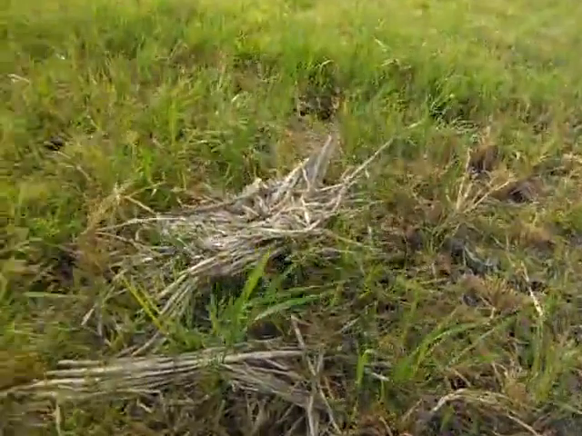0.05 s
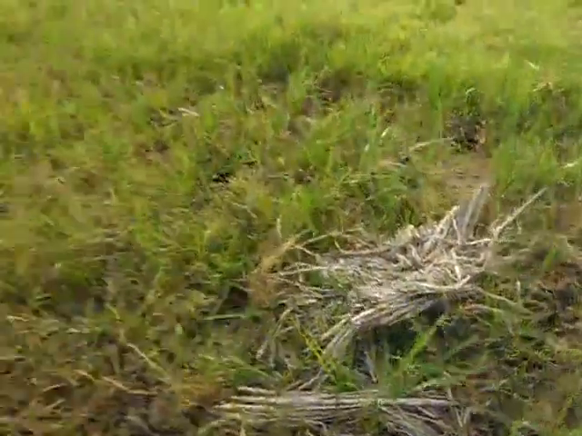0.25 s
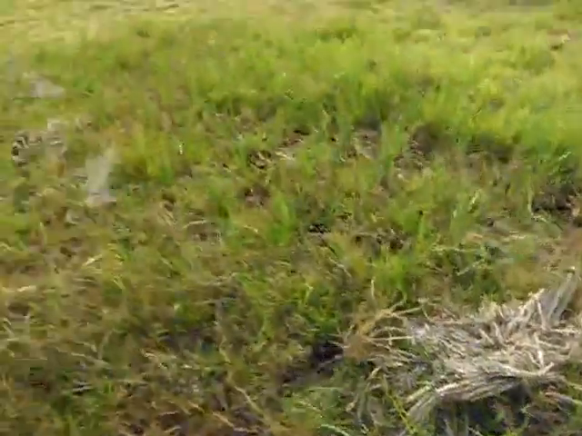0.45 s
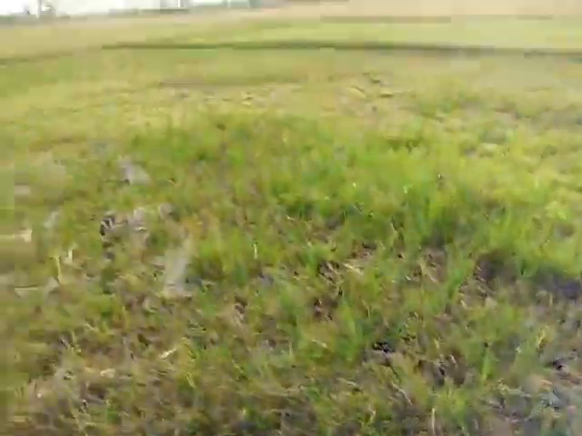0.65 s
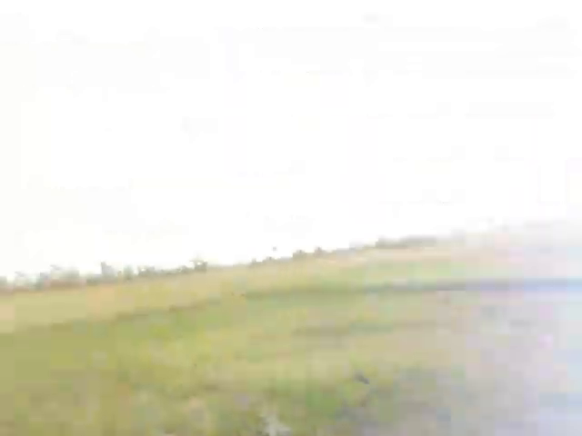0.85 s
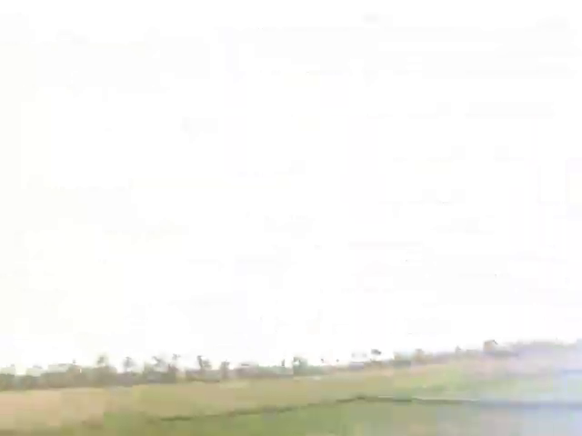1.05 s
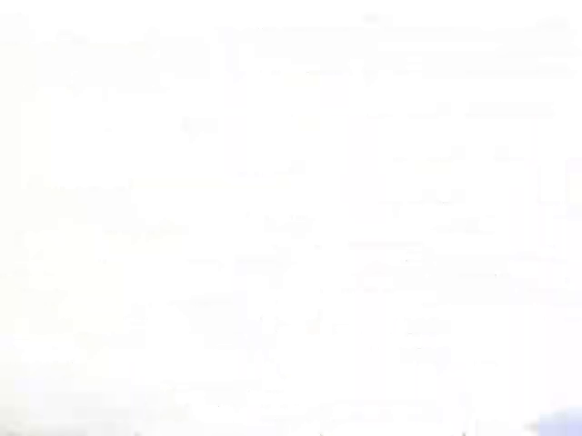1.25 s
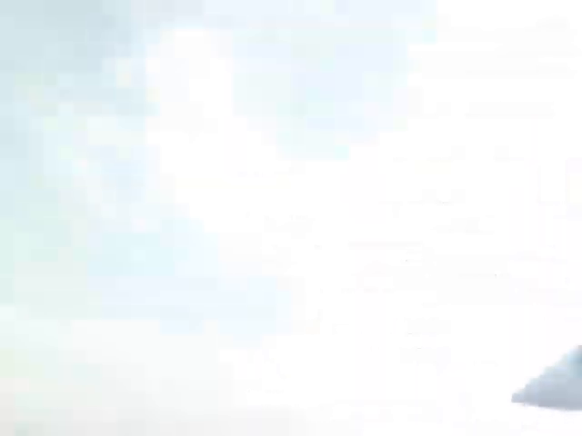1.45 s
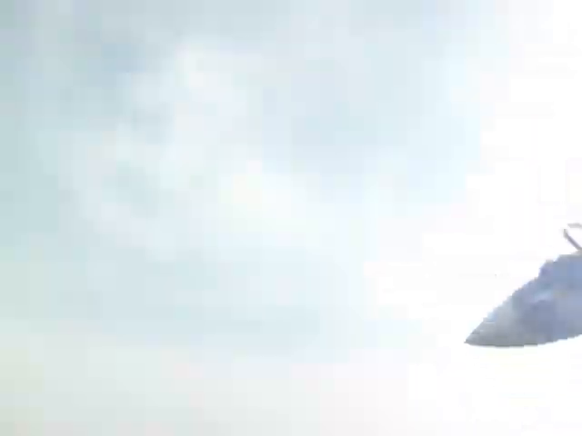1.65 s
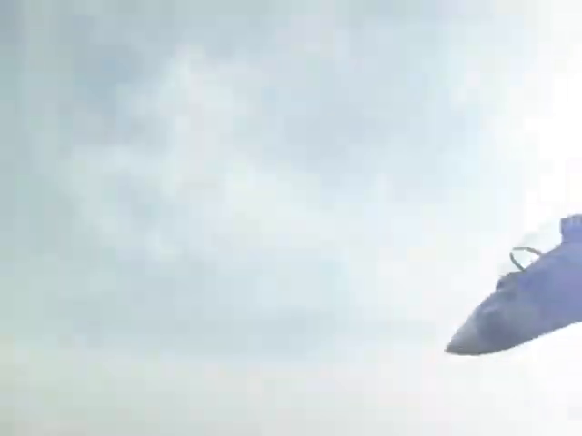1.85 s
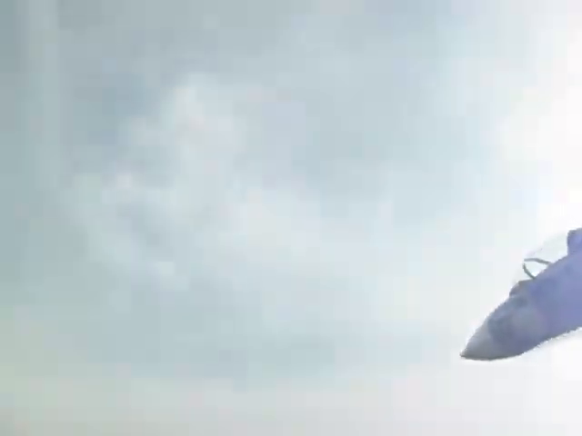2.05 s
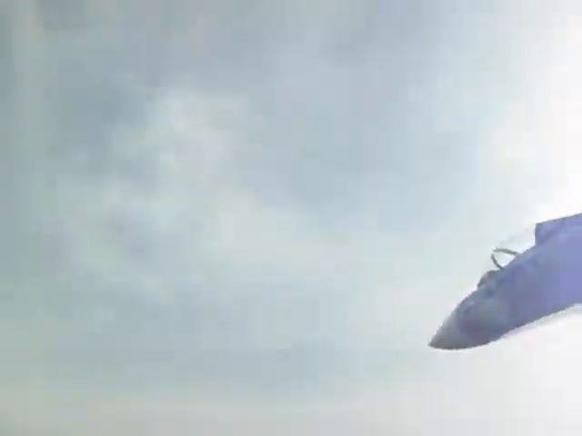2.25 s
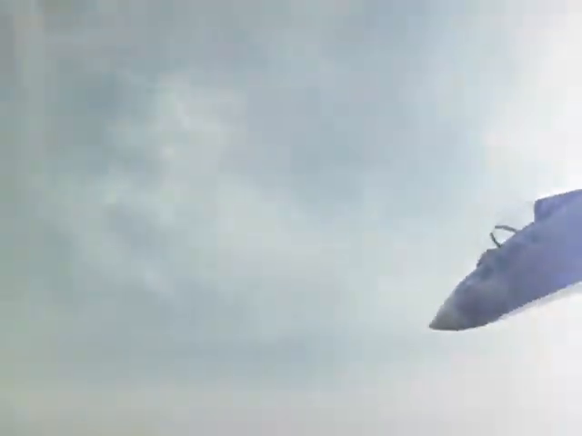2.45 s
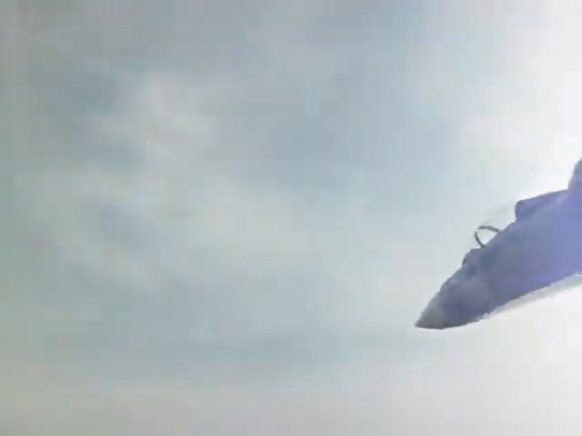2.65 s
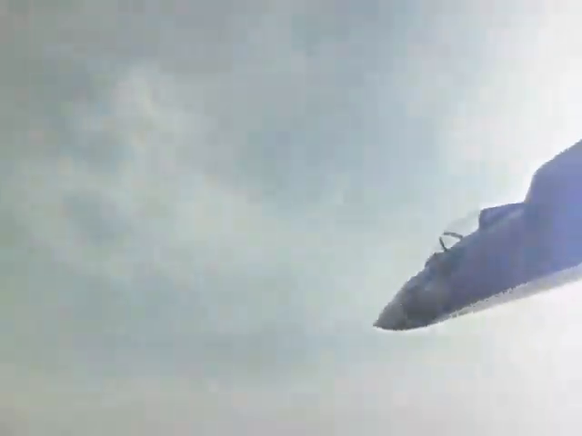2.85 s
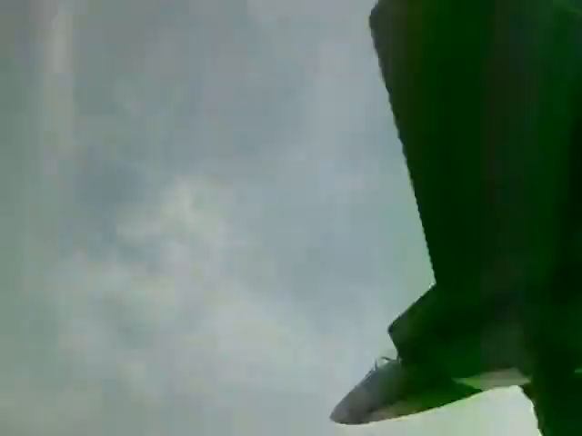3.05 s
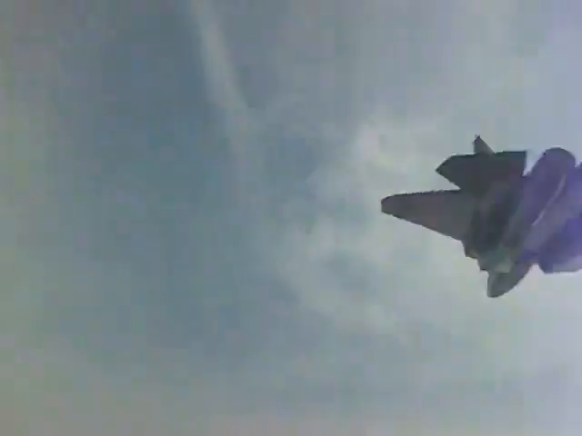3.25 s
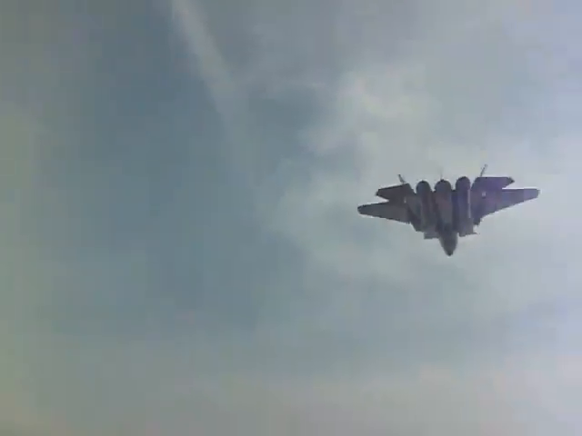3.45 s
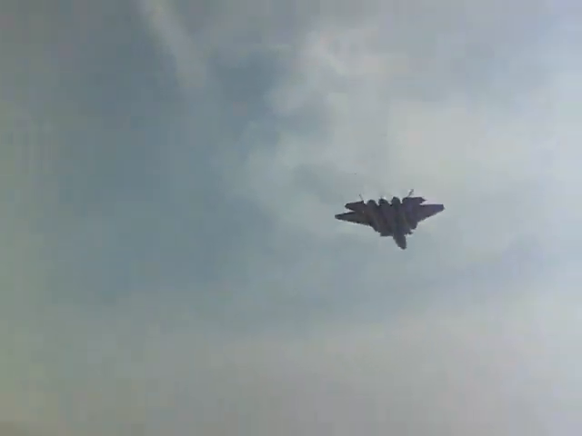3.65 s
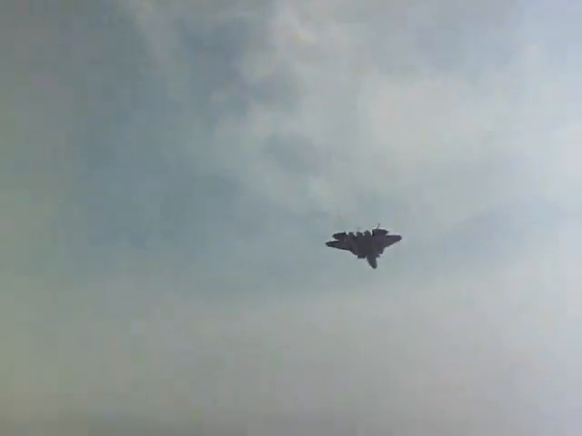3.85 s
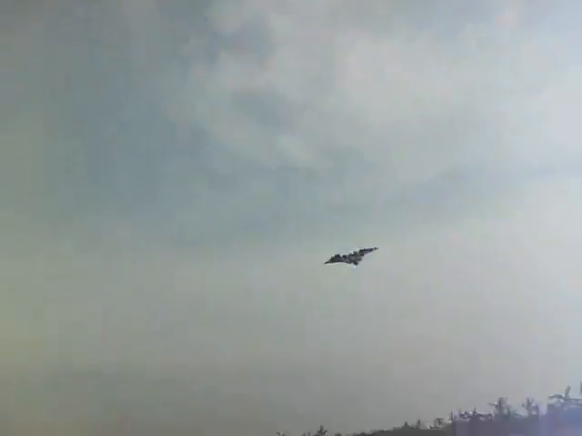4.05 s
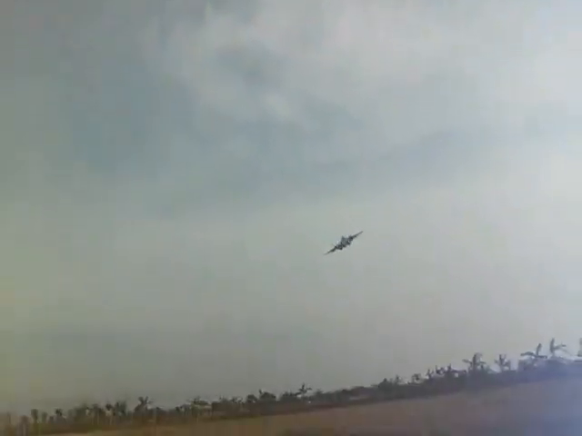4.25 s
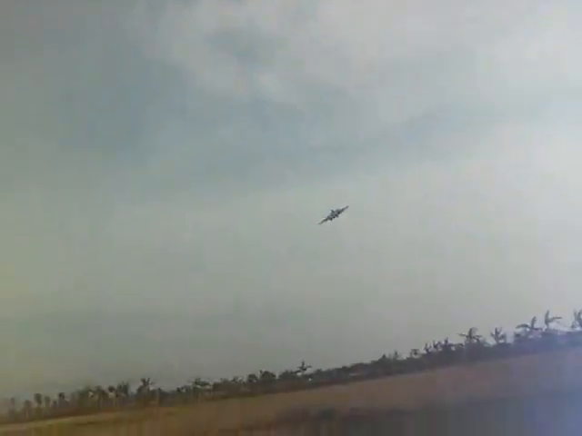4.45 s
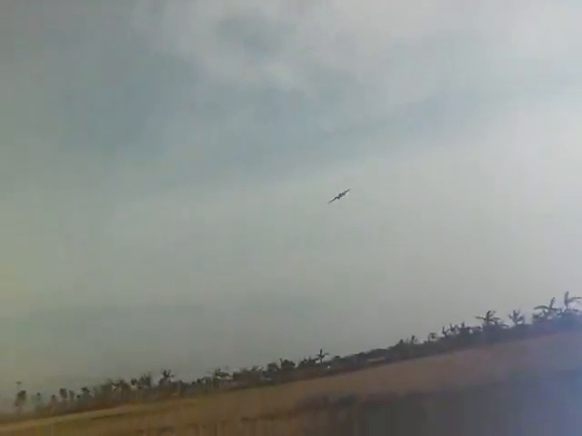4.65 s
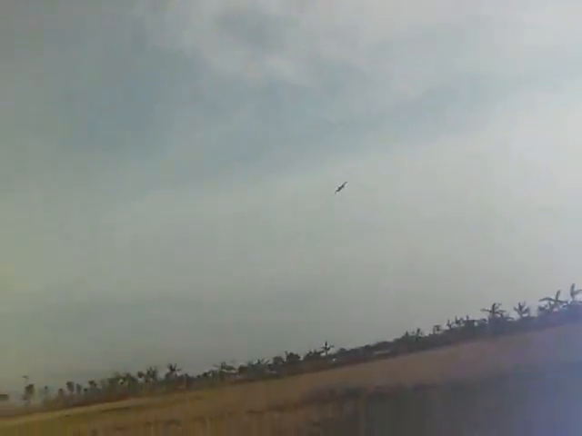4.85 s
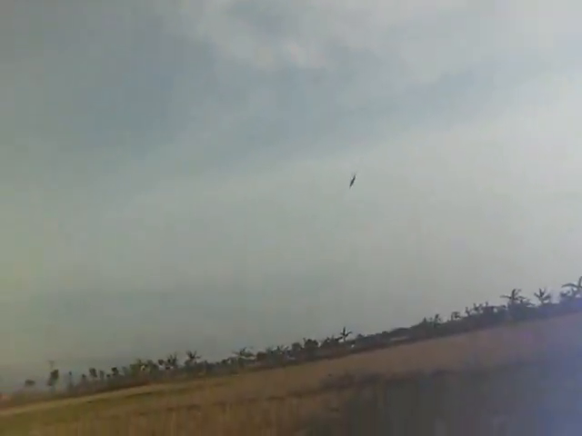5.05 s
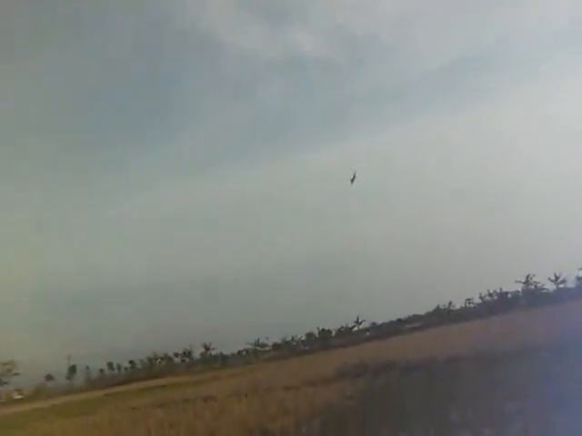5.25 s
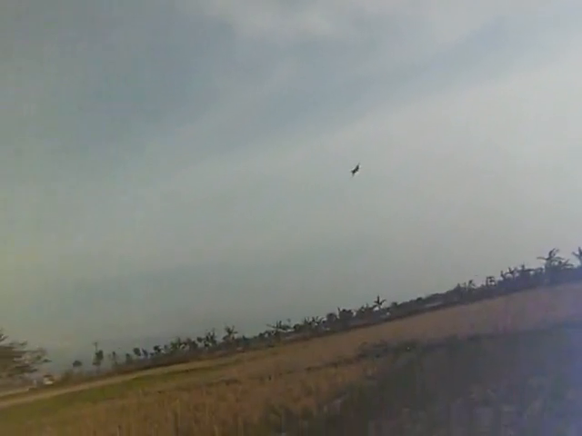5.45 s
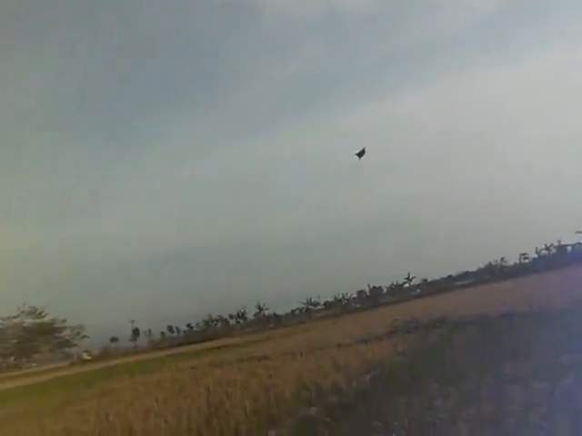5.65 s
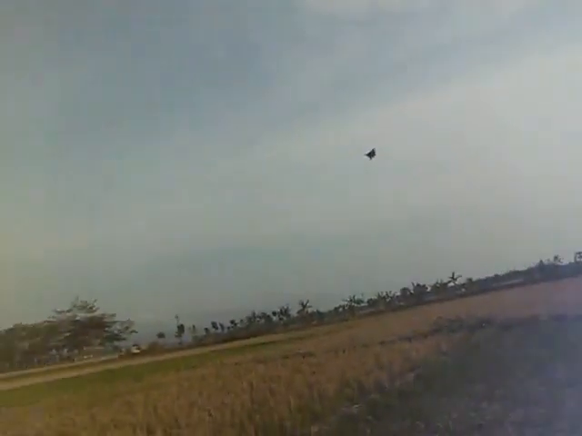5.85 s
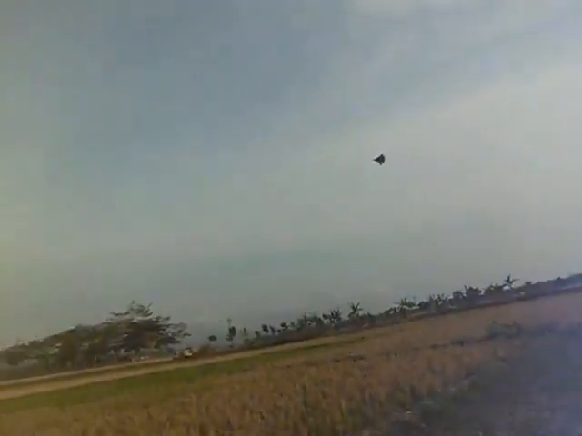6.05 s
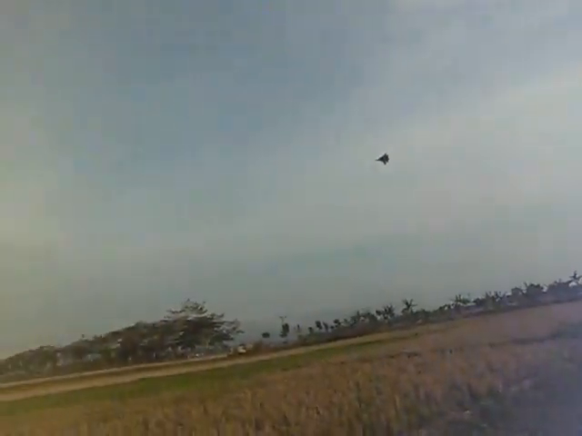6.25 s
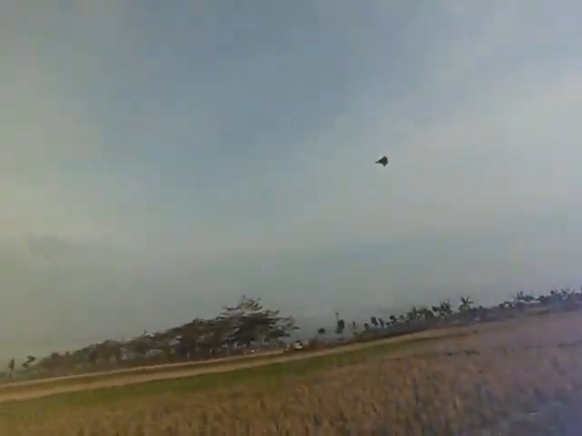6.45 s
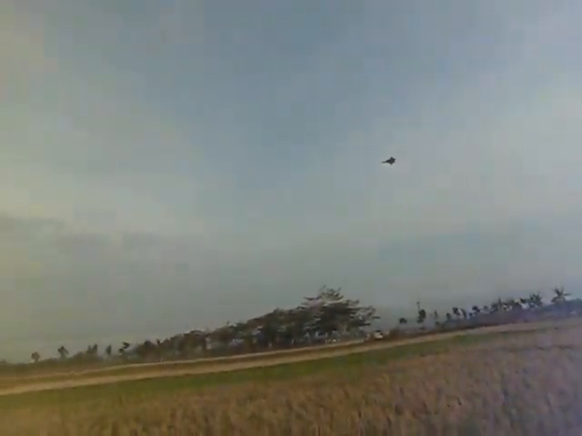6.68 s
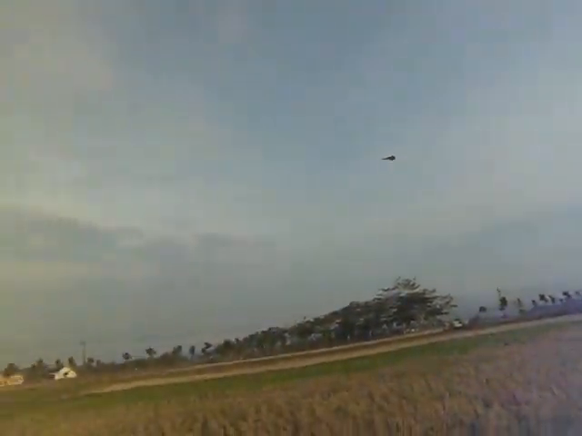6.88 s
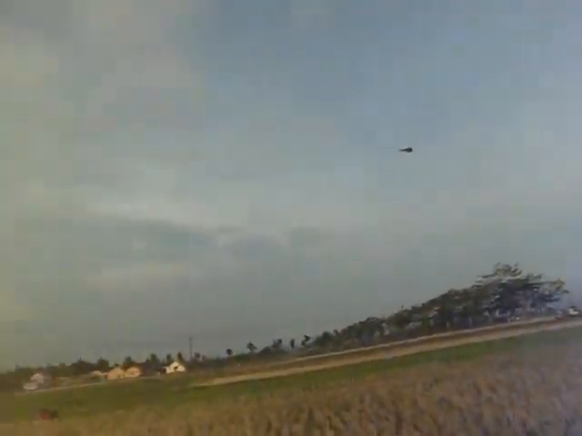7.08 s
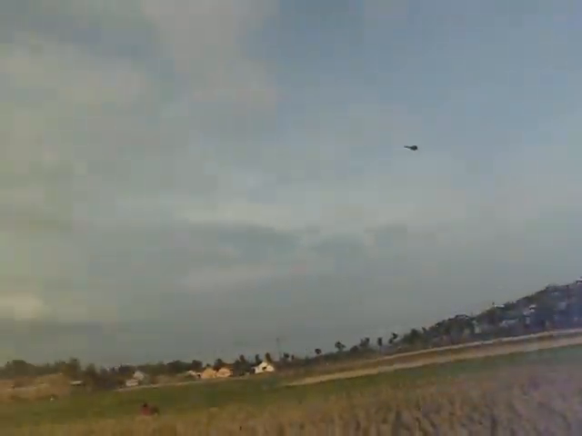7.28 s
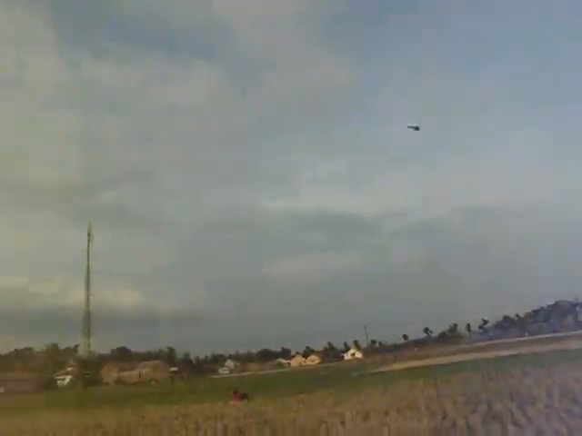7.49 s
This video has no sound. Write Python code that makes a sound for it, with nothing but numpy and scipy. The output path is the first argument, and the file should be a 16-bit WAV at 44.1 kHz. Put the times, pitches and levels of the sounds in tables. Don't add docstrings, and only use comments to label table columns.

```python
import sys
import numpy as np
from scipy import signal
from scipy.fft import rfft, irfft, next_fast_len
from scipy.io import wavfile
from scipy.ndimage import uniform_filter1d, map_coordinates

SR = 44100
rng = np.random.default_rng(int(sys.argv[2]) if len(sys.argv) > 2 else 0)


def amplitude_ratio(level_db):
    exponent = np.asarray(level_db, float) / 20
    return 10 ** exponent


def put_to_file(sound):
    columns = np.atleast_2d(sound).T
    safe = np.clip(columns, -1, 1)
    whole_steps = np.round(safe * 32767)
    wavfile.write(sys.argv[1], SR, whole_steps.astype(np.int16))


N = 331670
SECONDS = np.arange(N) / SR


def unit(x):
    return x / np.sqrt(np.mean(x ** 2) + 1e-20)


def curves(rows, silent=None):
    s, *columns = np.transpose(rows)
    return [np.interp(SECONDS, s, column, silent, silent) for column in columns]


def wobble(rate):
    coarse = np.arange(0, N + 32, 32)
    knots = rng.standard_normal(int(N * rate / SR) + 6)
    return np.interp(np.arange(N), coarse, map_coordinates(knots, [coarse * rate / SR]))


def coloured(x, spectrum):
    size = next_fast_len(N + 8192)
    hz, db = np.transpose(spectrum)
    log_hz = np.log(np.fft.rfftfreq(size, 1 / SR) + 1)
    gain = amplitude_ratio(np.interp(log_hz, np.log(hz), db, -120, -120))
    return unit(irfft(rfft(x, size) * gain, size)[:N])


def patchy(depth_db):
    z = signal.stft(rng.standard_normal(N), nperseg=512)[2]
    field = uniform_filter1d(rng.standard_normal(z.shape), size=6, axis=0)
    field = uniform_filter1d(field, size=14, axis=1)
    return signal.istft(z * amplitude_ratio(depth_db * unit(field)), nperseg=512)[1][:N]


def tones(angles, dbs, drift_db, scatter):
    shares = scatter if isinstance(scatter, list) else [scatter] * len(angles)
    out = np.zeros(N)
    for i, (angle, db, share) in enumerate(zip(angles, dbs, shares)):
        level = np.sqrt(2) * amplitude_ratio(db + drift_db * wobble(5))
        phase = angle + i * i
        direct = (1 + share * wobble(42)) * np.sin(phase)
        out += level * (direct + share * wobble(42) * np.cos(phase))
    return out


# time in seconds, wind pressure in dB, sharpness in dB.
WIND = [(0, -30.5, -9.5), (.125, -20, 1.6), (.24, -30, 1), (.37, -22, 1), (.5, -27.5, 1), (.67, -34.5, 0),
        (.8, -31, 1), (1.0, -34.5, -0.5), (1.09, -45.5, 6.5), (3.3, -42, -16), (4.1, -52, 11),
        (6.0, -39, -18), (6.8, -41, -8), (7.03, -28.5, 11.5), (7.11, -16, -1.5), (7.29, -27.5, 5),
        (7.4, -24, 13), (7.5, -17.5, 3)]
# middle in seconds, pressure in dB, sharpness in dB, half length in seconds.
GUSTS = [(0.052, -36, 14, .012), (0.09, -36, 10, .012), (0.206, -30, 13.5, 0.013), (0.275, -30.5, 13, .012),
         (.317, -30, 15, .01), (0.346, -27, 13.5, .012), (.443, -32.5, 14, .012), (.476, -37, 10, .01),
         (0.797, -29.5, 12, .01), (7.243, -27, 11, 0.0095), (7.276, -28, 18.5, .01),
         (6.948, -33, 14, 0.013), (1.328, -41, 19, 0.038), (1.614, -40, 15, 0.19), (1.94, -31.5, -23, 0.15),
         (2.164, -37.5, 22.5, 0.082), (2.378, -44, -9.5, 0.053), (2.647, -37, -26, 0.084),
         (2.807, -35, 16, 0.1), (2.958, -34.5, 25, 0.13), (3.116, -31.5, 16.5, 0.062),
         (3.271, -35, 0.5, 0.095), (3.457, -29, 5, 0.036), (3.526, -28, 15.5, 0.016),
         (3.582, -27.5, -23, 0.059), (3.678, -30, -8.5, 0.095), (3.791, -26, -20, 0.051),
         (3.917, -34, -30, 0.11), (4.103, -44, -6, 0.069), (4.497, -34, -11, 0.094), (4.69, -31, -33, 0.1),
         (4.895, -36, -25, 0.065), (5.278, -41, -18, 0.094), (5.403, -30, -27, .03),
         (5.64, -32.5, -24, 0.07), (5.809, -38.5, -3, 0.048), (6.281, -29, -14.5, 0.16),
         (6.568, -26, 9.5, 0.035), (6.61, -33.5, 22.5, 0.029), (7.044, -22, 19, 0.0085),
         (7.451, -23, 15, 0.061)]


def wind_levels():
    t = np.arange(0, N + 64, 64) / SR
    s, db, sharp_db, half_s = np.transpose(GUSTS)[..., None]
    wind_s, *columns = np.transpose(WIND)
    steady_db, steady_sharp_db = [np.interp(t, wind_s, column) for column in columns]
    push = np.vstack([steady_db, db - 12 * np.abs(t - s) / half_s])
    sharp = np.vstack([steady_sharp_db, sharp_db + 0 * t])
    over_db = push + 20
    eddy = -20 + 1.456 * over_db + 0.34 * sharp
    tear = -26.5 + 1.673 * over_db + sharp
    return [np.interp(SECONDS, t, 10 * np.log10(amplitude_ratio(2 * v).sum(axis=0))) for v in (push, eddy, tear)]


# frequency in Hz, level in dB per Hz.
SWELL = [(5, -6.5), (36, 4.5), (60, -3), (110, -19), (200, -67.5)]
EDDY = [(40, -17), (85, 2), (140, -1), (220, -16), (450, -36.5)]
TEAR = [(110, -37), (200, -1), (330, -3), (500, -8), (800, -20.5), (1500, -48)]
LASH = [(250, -41), (500, -4.5), (750, 3.5), (1500, -8.5), (2700, -30.5), (4500, -59), (7000, -57)]
# time in seconds, drop in dB, fall time in milliseconds.
RIPS = [(0.1175, -13, 0.7), (0.124, -7.5, 0.56), (0.1305, -15, 0.3), (0.316, -12.5, 0.83),
        (0.3515, -11.5, 0.75), (0.3582, -14.5, 0.54), (0.3671, -8, 0.81), (0.3967, -14, 0.87),
        (0.406, -13, 0.63), (6.542, -19, 0.95), (6.5486, -15.5, 1), (6.556, -22, 0.66), (6.5624, -20, 0.65),
        (6.5684, -26, 0.38), (6.575, -21, 0.54), (6.602, -20.5, 0.5), (6.6135, -18, 0.69),
        (6.6175, -16.5, 0.56), (6.97, -14, 0.5), (6.991, -15, 0.65), (7.0402, -15.5, 0.26),
        (7.0451, -14.5, 0.39), (7.053, -16.5, 0.86), (7.0794, -7.5, 0.41), (7.094, -11, 0.8),
        (7.1074, -5.5, 0.59), (7.1229, -10, 0.35), (7.132, -10, 0.66), (7.1385, -10, 0.4),
        (7.1422, -14, 0.4), (7.1492, -3.5, 0.42), (7.1739, -7, 0.59), (7.1894, -5, 0.47),
        (7.2087, -5, 0.77), (7.2624, -9, 0.79), (7.2827, -10, 0.43), (7.3482, -21.5, 0.6),
        (7.3765, -7, 0.59), (7.3927, -6.5, 0.46), (7.4023, -4, 0.35), (7.4104, -6, 0.33),
        (7.4156, -8, 0.44), (7.4203, -11, 0.47), (7.4243, -8, 0.2), (7.4275, -11, 0.54),
        (7.4365, -11, 0.37), (7.4397, -3.5, 0.21), (7.4437, -17, 0.16), (7.4461, -2, 0.25),
        (7.4495, -16, 0.46), (7.4553, -4, 0.22), (7.4602, -4, 0.57), (7.467, -3, 0.17),
        (7.4723, -5.5, 0.18), (7.48, -6, 0.57), (7.486, -7, 0.39), (7.4988, -8.5, 0.44),
        (7.5088, -17, 0.45), (7.5121, -11, 0.26)]


def wind():
    swell_db, eddy_db, tear_db = wind_levels()
    bursts = rng.standard_normal(N) * amplitude_ratio(4.5 * wobble(220) + 1.5 * wobble(45))
    bursts /= np.sqrt(np.abs(uniform_filter1d(bursts ** 2, size=3500)))
    drops, hush = np.zeros(N + SR), np.zeros(N + SR)
    t = np.arange(-600, 600) / SR
    build_s, refill_s = 0.0024, 0.0026
    for s, db, fall_ms in RIPS:
        start = round(s * SR) - 600
        shape = np.exp(-np.abs(t) / np.where(t < 0, build_s, refill_s))
        drops[start:][:len(t)] -= amplitude_ratio(db - 4) * np.tanh(2000 * t / fall_ms) * shape
        hush[start:][:len(t)] += np.hanning(len(t))
    bursts *= amplitude_ratio(-6 * np.minimum(hush[:N], 1))
    lash_db = tear_db - 0.5 + 2.1 * np.minimum(tear_db + 20, 0)
    out = amplitude_ratio(swell_db) * coloured(rng.standard_normal(N), SWELL)
    out += amplitude_ratio(eddy_db + 0.2) * coloured(bursts, EDDY)
    out += amplitude_ratio(tear_db - 1.55) * coloured(bursts, TEAR)
    out += amplitude_ratio(lash_db) * coloured(bursts, LASH)
    return out + drops[:N]


# time in seconds, level in
# dB, pitch in Hz.
TICKS = [(0.276, -48, 2100), (0.2753, -50, 6000), (0.4214, -46.5, 3300), (0.441, -47, 3370),
         (0.441, -44.5, 5340), (.006, -49, 4400), (.441, -51, 2490), (0.5067, -46, 2340),
         (0.5067, -46, 5850), (.622, -56, 5400), (0.6946, -44, 5000), (0.695, -45, 2160), (.705, -54, 2600),
         (.712, -55, 4400), (.722, -58, 3600), (.74, -61, 3000), (.765, -57.5, 2400), (0.796, -52, 2190),
         (.789, -47, 7900), (.807, -46, 2390), (.807, -52, 4500), (0.816, -45, 7200), (0.84, -37, 7550),
         (.84, -45, 3470), (0.8699, -36, 4640), (7.411, -35.5, 3000), (7.439, -39, 3500),
         (7.4465, -38, 4500), (7.455, -36, 3980), (7.455, -40, 5600), (7.4595, -37, 4270),
         (7.46, -40, 5750), (7.466, -38, 4200), (7.468, -40, 5600), (7.472, -40, 4000), (7.515, -33, 3190),
         (7.352, -36, 2200), (7.09, -40, 2600)]


def short_ticks():
    out, t = np.zeros(N + SR), np.arange(600) / SR
    for s, db, hz in TICKS:
        envelope = amplitude_ratio(db + 4 - 60 * t / .011) * (1 - np.exp(-t / .0007))
        rough_phase = np.cumsum(rng.normal(0, .17, len(t)))
        out[round(s * SR):][:len(t)] += envelope * np.sin(2 * np.pi * hz * t + rough_phase)
    return out[:N]


# start in seconds, level in dB.
TRILLS = [(0.04, -63.5), (0.146, -65.5), (0.257, -63.5), (0.361, -63), (.465, -65), (.565, -63.5),
          (.67, -63.5), (0.771, -67)]
# start in seconds, level in dB.
ANSWERS = [
    (.51, -68),
]


def insect():
    out, t = np.zeros(N), np.arange(300) / SR
    slide_hz_per_s = 190000
    for trills, hz in [(TRILLS, 9600), (ANSWERS, 8300)]:
        strokes = np.zeros(N)
        for s, db in trills:
            count = np.arange(10)
            places = np.round((s + count / 134) * SR).astype(int)
            strokes[places] = amplitude_ratio(db + rng.normal(0, 1.2, len(count)))
        ring = np.hanning(len(t)) * np.sin(2 * np.pi * (hz - slide_hz_per_s * t / 2) * t)
        out += 5 * signal.fftconvolve(strokes, ring)[:N]
    chorus_colour = [(8000, -31), (8800, -4), (9600, -0.5), (10300, -20), (11000, -51)]
    return out + amplitude_ratio(-65.5) * coloured(patchy(depth_db=2), chorus_colour)


# time in seconds, shaft turns in Hz, winding whine in dB.
START = [(.85, 12, -75), (.885, 27, -60), (.93, 52, -57), (.96, 71, -52), (.978, 88, -58), (.99, 101, -51),
         (1.02, 119, -49), (1.045, 129, -50), (1.075, 140, -54), (1.12, 152, -57), (1.16, 161, -66),
         (1.2, 167, -75)]
# time in seconds, shaft turns in Hz, airframe vibration in dB,
# unbalance in dB (odd multiples of the shaft rate over even ones).
SHAFT = [(1.269, 171.2, -52, -16), (2.03, 173.6, -46.5, -5), (2.3, 184.7, -45.5, -7.5),
         (2.44, 209.2, -45, 16.5), (2.6, 259.8, -32.5, 12), (2.7, 280.6, -35.5, 7.5), (2.83, 301, -28, 1),
         (2.95, 307.2, -28, 7.5), (3.17, 316, -28.5, 1.5), (3.5, 323.3, -32, 3), (3.82, 342, -35.5, -3),
         (4.1, 345.4, -42, -3), (4.4, 338.3, -49, -2), (4.899, 336.9, -48.5, -11), (5.3, 335.1, -54, -0.5),
         (5.89, 337.6, -56.5, 8), (6.601, 345.8, -59.5, 14.5), (7.52, 351, -60, 2)]


def shaft_angle():
    shaft_hz = curves([row[:2] for row in START + SHAFT])[0]
    return 2 * np.pi * np.cumsum(shaft_hz) / SR


def turning_hz(angle):
    return np.gradient(angle) * SR / (2 * np.pi)


def held_share():
    release_s, let_go_s = 3.13, .04
    return np.clip((release_s + let_go_s - SECONDS) / let_go_s, 0, 1)


# time in seconds, loudness in dB from thrust and distance, how far the disc rim
# faces us in dB, the order (multiple of the shaft rate) beamed most strongly at us.
FLIGHT = [(1.02, -43.5, -6, 12), (1.22, -43, -8, 13), (2.34, -39.5, -5, 14), (2.58, -27, -4.5, 8),
          (2.72, -25.5, 1.5, 11.5), (2.86, -25, -1, 14.5), (2.98, -20, -1.5, 7), (3.12, -21, 5, 13),
          (3.3, -24, 1, 11), (3.98, -38, 6.5, 14), (4.14, -46, 0.5, 12), (4.56, -49.5, -1.5, 12),
          (4.95, -51, -1, 10.5), (5.12, -44.5, 1.5, 11), (5.3, -49.5, 1, 13), (5.51, -45.5, 6.5, 16.8),
          (6.2, -54, 5, 17.2), (7.1, -58, -1, 14.2)]
# frequency in Hz, level in dB per Hz.
DRUM = [(300, -14.5), (560, -6), (720, 0), (1050, 2), (1600, -6.5), (1950, 0.5), (2300, -1.5), (2800, -8),
        (3600, -2)]
WAKE = [(400, -17.5), (900, -12), (1800, -7.5), (2800, -4.5), (3700, 2.5), (4500, 3.5), (6000, 0.5),
        (8000, -7.5), (11000, -42)]
TIPS = [(6000, -2), (9000, -2.5), (11000, -8.5), (13000, -16), (15800, -9)]


def airflow(angle):
    held = held_share()
    loud_db, rim_db, _ = curves(FLIGHT)
    chop = 1 + 0.39 * np.cos(2 * angle) + 0.06 * np.cos(angle)
    rise_db = np.minimum(95 * (SECONDS - FLIGHT[0][0]), 0)
    rise_db = np.where(SECONDS < .83, -99, rise_db)
    drum_held_db = -37.5 + 0.62 * (loud_db + 39.5)
    drum_flown_db = -57.5 + .35 * (loud_db + 36)
    drum_db = held * drum_held_db + (1 - held) * drum_flown_db
    wake_db = loud_db - .5 - 2.8 * (1 - held)
    flow = amplitude_ratio(drum_db) * coloured(patchy(depth_db=1.4) * chop, DRUM)
    flow += amplitude_ratio(wake_db) * coloured(patchy(depth_db=1.2) * chop, WAKE)
    flow += amplitude_ratio(loud_db + rim_db - 7) * coloured(patchy(depth_db=1.3) * chop, TIPS)
    return amplitude_ratio(rise_db) * flow


# time in seconds, level in dB.
SWITCH = [
    (.85, -70),
    (.95, -52),
    (1.08, -67),
    (1.35, -54.5),
    (2.3, -43),
    (2.42, -45),
    (2.55, -34),
    (2.75, -36),
    (2.85, -58),
]
# frequency in Hz, level in dB.
CAN = [(1000, -12), (2300, -3), (3000, 1), (3600, -7), (4300, 3), (5400, 2), (6200, -3), (7800, -4)]


def controller(angle):
    whistle_db = curves(SWITCH, -120)[0]
    switch = 2 * np.pi * 7977 * SECONDS
    sides = [switch, switch - 2 * angle, switch - angle, switch + angle]
    side_dbs = [whistle_db, whistle_db - 28, whistle_db - 24, whistle_db - 26]
    whistle = tones(sides, side_dbs, drift_db=3.5, scatter=.12)
    whine_db = curves(START, -120)[1] + 1.5
    steps = 42 * angle
    folds = [steps, steps / 2, switch - steps, switch - steps / 2]
    can_hz, can_db = np.transpose(CAN)
    fold_dbs = [whine_db + db + np.interp(turning_hz(fold), can_hz, can_db)
                for fold, db in zip(folds, [0, -1, -6, -7])]
    return whistle + tones(folds, fold_dbs, drift_db=1.5, scatter=.7)


# frequency in Hz, width in Hz, strength in dB.
SHELL = [(351, 67, 16.5), (631.3, 12.7, 5), (773, 180, -1.5), (904.6, 18.7, 11.5), (938, 11.1, -2.5),
         (1091, 36, 15.5), (1256, 19, -0.5)]


def shell_db(hz):
    f = np.arange(1., 2000)
    ring = 1 + sum(amplitude_ratio(db) * 1j * f * width / (centre * centre - f * f + 1j * f * width)
                   for centre, width, db in SHELL)
    near = np.clip((3.12 + .2 - SECONDS) / .2, 0, 1)
    return near * np.interp(hz, f, 20 * np.log10(np.abs(ring)))


# middle in seconds, order, gain in dB, half length in seconds.
ORDER_SWELLS = [(1.187, 3, 16, 0.093), (2.38, 4, -4, 0.2), (2.408, 5, 20, 0.075), (2.5, 6, -11, .1),
                (1.75, 4, -4.5, 0.87), (7.3, 14, 6, 0.25), (2.438, 3, -7.5, 0.038), (2.541, 4, -2, .05),
                (2.728, 4, 9, 0.055), (2.916, 4, -8, 0.028), (3.017, 3, -14, 0.014), (3.062, 4, 5, 0.033),
                (3.345, 3, -8, 0.023), (3.36, 2, -15, 0.027), (3.433, 3, -6, 0.015), (3.52, 4, -7, 0.02),
                (3.597, 5, 6, 0.039), (3.683, 3, -7, 0.049), (3.798, 2, -10, 0.031), (3.803, 4, -9, 0.041),
                (3.8, 6, -2.5, 0.23), (1.55, 14, -5, 0.63), (4.05, 3, -1, 0.08), (4.057, 2, -12, 0.045),
                (4.2, 10, 4.5, 0.67), (4.3, 7, -5, 0.31), (4.549, 6, 7, 0.11), (4.6, 8, -2, .25),
                (4.751, 18, -11, 0.22), (5.0, 3, -14, 0.022), (5.45, 5, -16.5, 0.52), (5.55, 20, -9, 0.36),
                (5.477, 14, 6, 0.064), (5.65, 1, 9, 0.36), (5.853, 16, 7.5, 0.42), (5.92, 18, 6.5, 0.24),
                (5.87, 24, -12, .12), (6.05, 20, 10, 0.13), (6.25, 5, 7, .2), (6.2, 7, -8, 0.067),
                (6.3, 14, 5, 0.3), (6.502, 1, -3, 0.38), (6.549, 12, 1, 0.09), (6.8, 14, -6, 0.1),
                (6.85, 18, -17, 0.11), (6.901, 20, -14, 0.14), (6.92, 12, -13, 0.074), (6.8, 5, 1, 0.22),
                (6.898, 2, 11.5, 0.3),
                (2.66, 5, -6, 0.09), (2.703, 11, 8, 0.087), (2.7, 13, 8, .06), (2.7, 14, -3, 0.045),
          (2.7, 18, -10, .06), (2.797, 8, 8, .13), (2.835, 9, 7.5, 0.104), (2.846, 10, -10, 0.19),
          (2.902, 11, -17.5, 0.083), (2.992, 4, 4.5, 0.055), (3.189, 5, 10.5, 0.063), (3.194, 6, 14, 0.035),
          (3.25, 7, -9, 0.064), (3.3, 11, 6.5, .25), (3.35, 16, 5.5, .13), (3.448, 13, 9, .12),
          (3.506, 6, -3, 0.24), (3.555, 7, -4, .1), (3.7, 8, -11, 0.045), (3.754, 9, 12, .08),
          (4.1, 4, -4, 0.081), (5.306, 10, 5, 0.23), (6.502, 9, 10, 0.18)]


def order_gain_db(order):
    t = np.arange(0, N + 64, 64) / SR
    total_db = np.zeros(len(t))
    for s, k, db, half_s in ORDER_SWELLS:
        if round(k) == order:
            total_db += db * np.exp(-((t - s) / half_s) ** 2)
    return np.interp(SECONDS, t, total_db)


# time in seconds, scattered share from 0 to 1.
SCATTER = [(1, .17), (3.2, .12), (3.9, .3), (4.4, .3), (4.8, .2)]
# order, level in dB.
HUM = [(2, 0.6), (3, 0.6), (4, -4.5)]
# time in seconds, tilt in dB.
BANK = [(2.6, 15), (2.85, -7), (3.08, -2.5), (3.2, 2), (3.36, 11.5), (3.52, -1), (3.72, 10.5), (3.88, 0),
        (4.08, 6), (4.3, -3), (4.6, -3), (5.12, 8.5), (5.4, 1), (5.9, -7), (6.5, 15), (6.75, 11), (7.0, 19)]


def airframe_hum(angle):
    air, shaft_hz = curves(SCATTER)[0], turning_hz(angle)
    shake_db, odd_db = curves(SHAFT)[1:]
    bank_db = curves(BANK)[0]
    ground = .38 * np.exp(-((SECONDS - 4.15) / .3) ** 2)
    angles, dbs, scatter = [], [], []
    for k, own_db in HUM:
        k = round(k)
        lag_hz = 7.3
        beat_db = 20 * np.log10(np.abs(1 + ground * np.exp(2j * np.pi * k * lag_hz * SECONDS)))
        db = shake_db + own_db + (k > 2) * beat_db + k % 2 * odd_db + (k - 3) * bank_db / 2
        angles.append(k * angle)
        dbs.append(db + shell_db(k * shaft_hz) + order_gain_db(k))
        idle_flutter = .45 * (k == 4) * (shaft_hz < 200)
        scatter.append(air * (k - 1) / 2 + idle_flutter)
    return tones(angles, dbs, drift_db=1.65, scatter=scatter)


# shaft turns in Hz, level in dB.
MOUNT = [(168, -7), (178, -1), (280, -1), (300, -15.5), (312, -9.5)]


def unbalance_shake(angle):
    held, shake_db = held_share(), curves(SHAFT)[1]
    held_db = shake_db + np.interp(turning_hz(angle), *np.transpose(MOUNT))
    flown_db = -57.5 + 0.33 * (shake_db + 39.5)
    db = held * held_db + (1 - held) * flown_db + order_gain_db(order=1)
    return tones([angle], [db], drift_db=-0.1, scatter=curves(SCATTER)[0])


# order, dB against the loudness.
TONES = [(5, -10.5), (6, -7.5), (7, -7), (8, -14.5), (9, -13), (10, -11.5), (11, -13.5), (12, -10),
         (13, -20.5), (14, -8.5), (15, -19), (16, -12), (17, -16.5), (18, -11), (19, -22), (20.0, -10.5),
         (22, -11.5), (24, -14), (26, -16), (28, -18), (21, -24), (23, -25), (30, -22.5), (32, -26)]


def blade_tones(angle):
    air, held, shaft_hz = curves(SCATTER)[0], held_share(), turning_hz(angle)
    loud_db, _, beam = curves(FLIGHT)
    spool_up = uniform_filter1d(np.gradient(shaft_hz), size=6000) * SR
    load_db = -2 * spool_up / 300 * (SECONDS > 1.3)
    angles, dbs = [], []
    for k, own_db in TONES:
        k = round(k)
        db = loud_db + own_db + order_gain_db(k) + load_db
        db = db + 5.5 * np.exp(-(np.log2(k / beam) / 0.39) ** 2)
        if k == 5:
            db = db + shell_db(k * shaft_hz)
        if k % 2 or k == 6:
            db = db - 0.23 * (1 - held) * (loud_db + 58)
        db = db + held * (-5 - 1.5 * (k % 2) - 1.5 * np.log2(k / 10))
        angles.append(k * angle)
        dbs.append(db)
    whine = tones(angles, dbs, drift_db=2.5, scatter=0.13 + 0.6 * air + .15 * held)
    whine *= np.interp(shaft_hz, [250, 280], [.6, 1])
    return whine * (1 + held * np.interp(shaft_hz, [255, 278, 296, 308], [0, .9, .8, .15]))


def propeller(angle):
    running = np.clip((SECONDS - 1.05) / 0.28, 0, 1)
    return airflow(angle) + running * (airframe_hum(angle) + unbalance_shake(angle) + blade_tones(angle))


# time in seconds, level in dB.
SNAPS = [(2.9015, -16.5), (2.912, -19), (2.915, -4.5), (2.9245, -9), (2.9513, -5), (2.9545, -16.5),
         (2.967, -6.5), (2.969, -16), (2.9745, -2.5), (2.9782, -2.5), (2.986, -4.5), (2.9902, 0),
         (3.01, -19), (3.053, -16.5), (3.0565, -23), (3.0735, -20), (3.077, -6), (3.08, -16), (3.0835, -13),
         (3.0928, -7), (3.099, -15), (3.109, -3.5), (3.112, -15), (3.121, -4)]


def overload_cracks():
    out, t = np.zeros(N + SR), np.arange(600) / SR
    for s, db in SNAPS:
        bright = np.diff(rng.standard_normal(len(t) + 1))
        out[round(s * SR):][:len(t)] += amplitude_ratio(db - 15) * unit(amplitude_ratio(-60 * t / 0.0016) * bright)
    return out[:N]


def scene():
    angle = shaft_angle()
    field = wind() + short_ticks() + insect()
    return (field + propeller(angle) + controller(angle) + overload_cracks())[None]


def mute_quiet_bands(x, under_db, quiet_db):
    z = signal.stft(x, nperseg=2048)[2]
    power = 2 * np.abs(z) ** 2
    band = np.arange(len(z)) // 32
    level = np.add.reduceat(power, np.arange(0, len(z), 32))[band]
    floor = amplitude_ratio(2 * under_db) * power.sum(axis=0) + amplitude_ratio(2 * quiet_db)
    keep = (level > floor) | (band < 2)[:, None]
    return signal.istft(z * keep, nperseg=2048)[1][:N]


def band_limit(x):
    return signal.sosfilt(signal.butter(12, 15700, fs=SR, output="sos"), x)


def record(dry):
    x = signal.sosfiltfilt(signal.butter(8, 15000, fs=SR, output="sos"), dry[0])
    x = x / (1 + np.abs(x / .74) ** 6) ** (1 / 6)
    x = mute_quiet_bands(x, under_db=-45.5, quiet_db=-80) + .0067
    return band_limit(x[None])


dry = scene()
out = record(dry)
put_to_file(out)
```